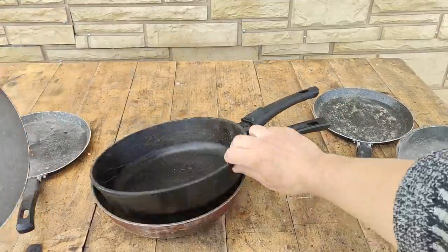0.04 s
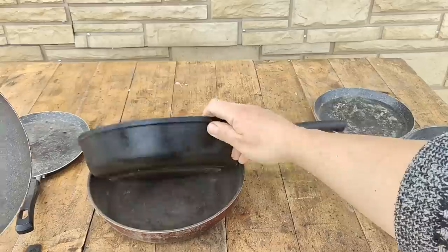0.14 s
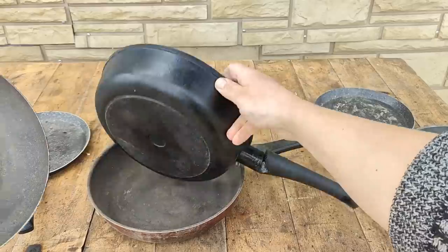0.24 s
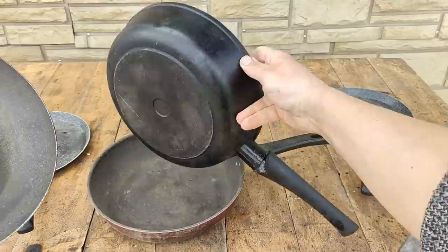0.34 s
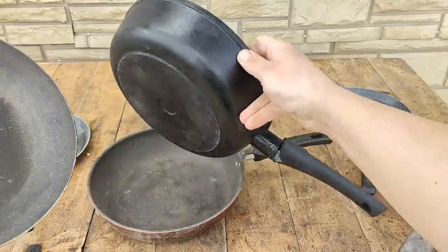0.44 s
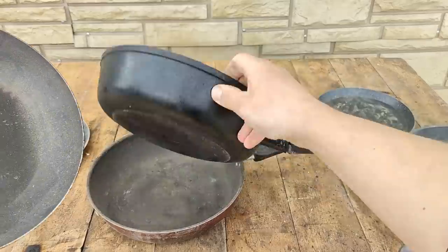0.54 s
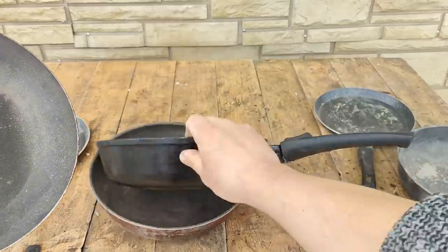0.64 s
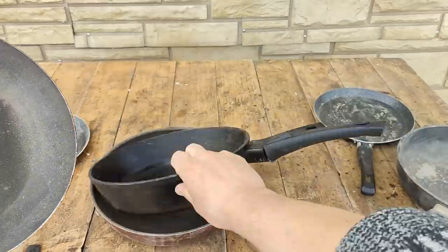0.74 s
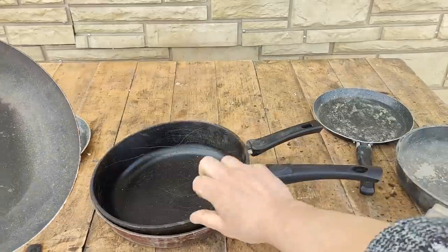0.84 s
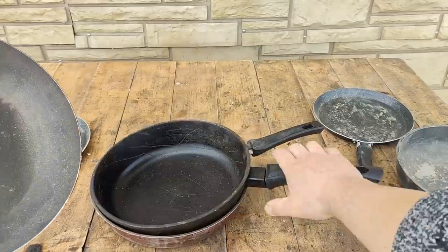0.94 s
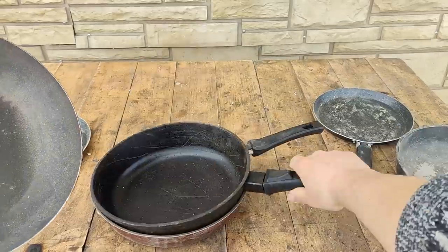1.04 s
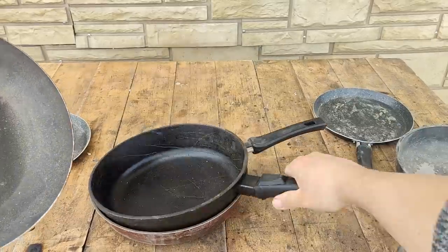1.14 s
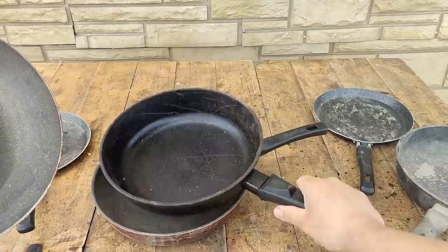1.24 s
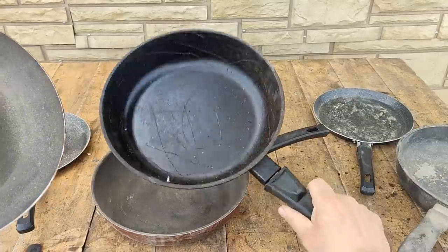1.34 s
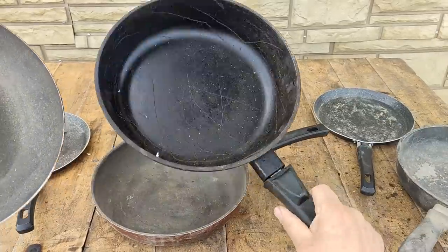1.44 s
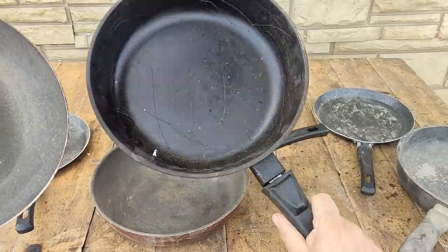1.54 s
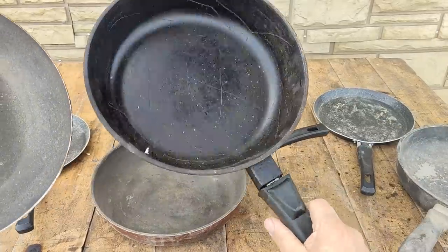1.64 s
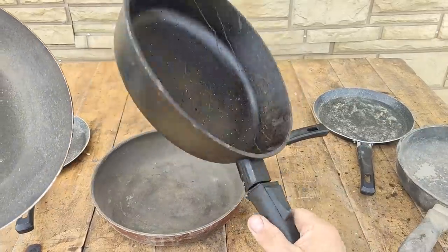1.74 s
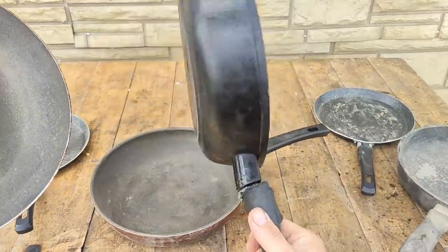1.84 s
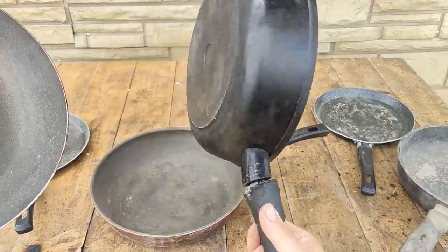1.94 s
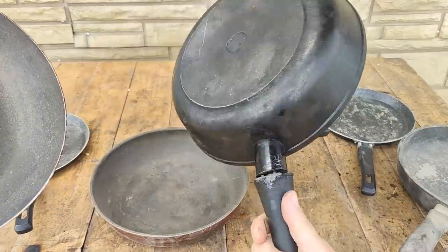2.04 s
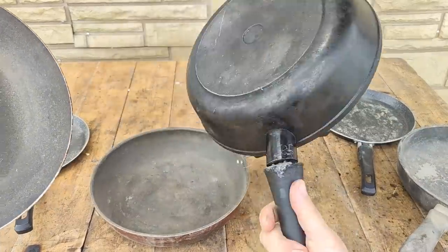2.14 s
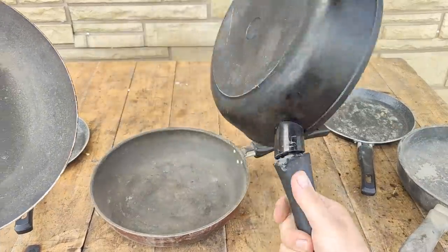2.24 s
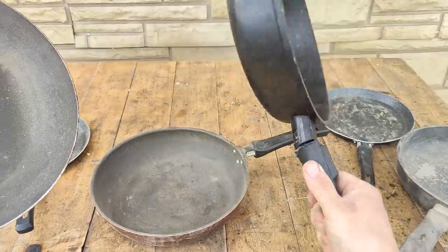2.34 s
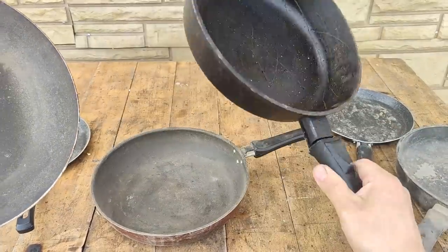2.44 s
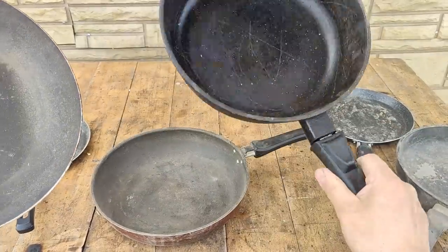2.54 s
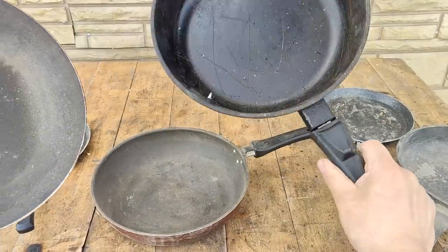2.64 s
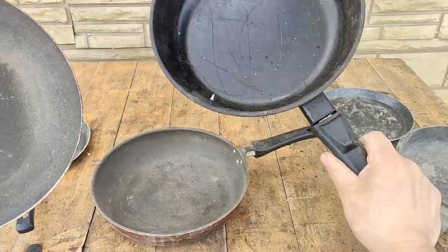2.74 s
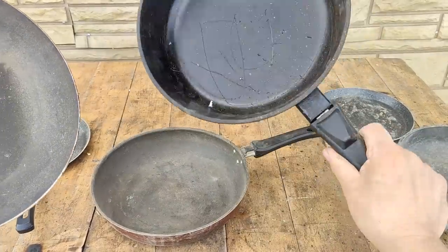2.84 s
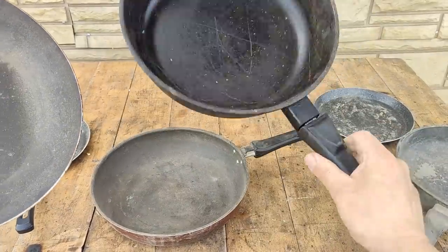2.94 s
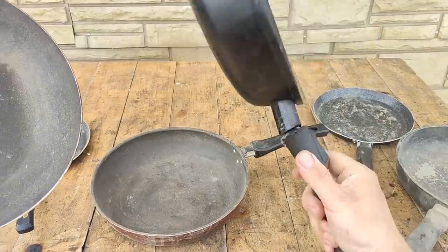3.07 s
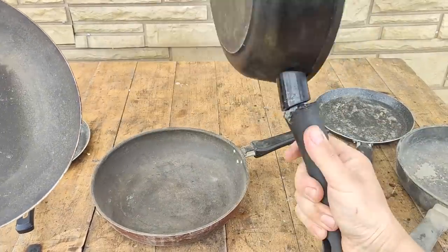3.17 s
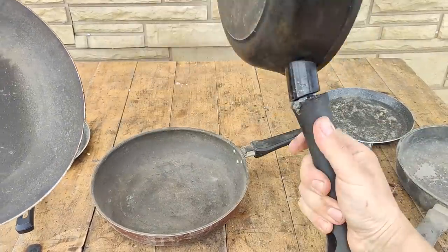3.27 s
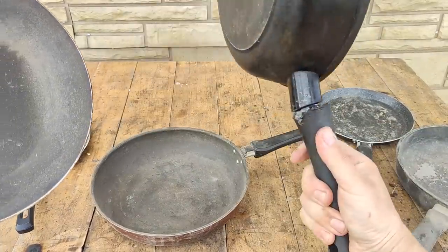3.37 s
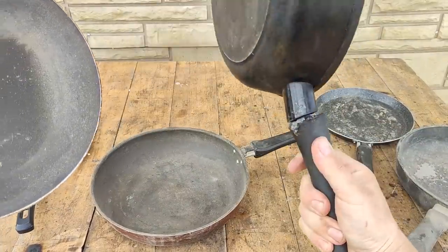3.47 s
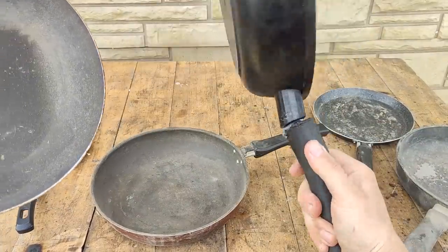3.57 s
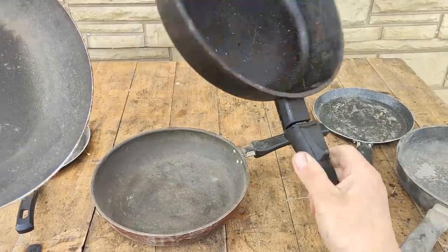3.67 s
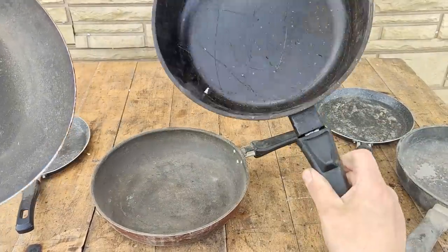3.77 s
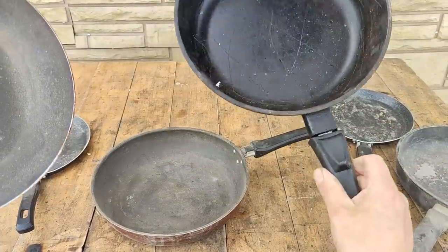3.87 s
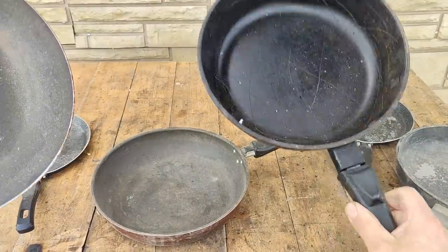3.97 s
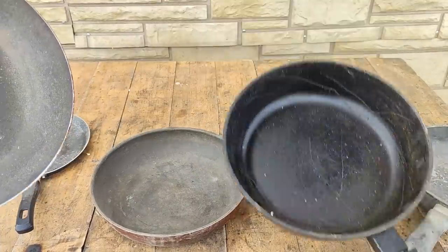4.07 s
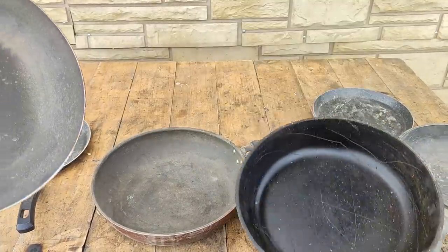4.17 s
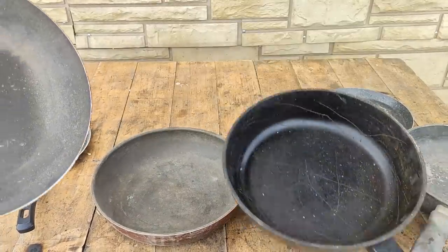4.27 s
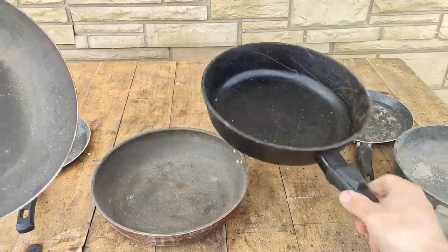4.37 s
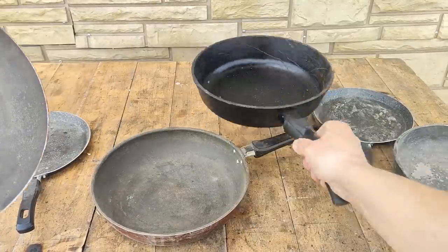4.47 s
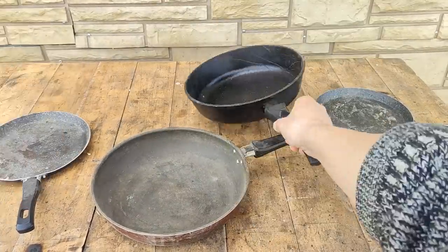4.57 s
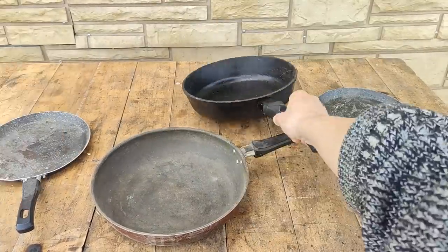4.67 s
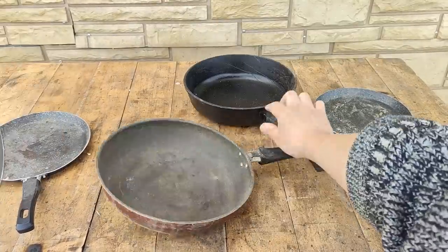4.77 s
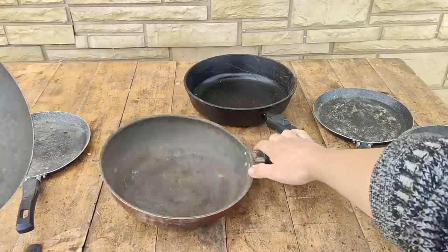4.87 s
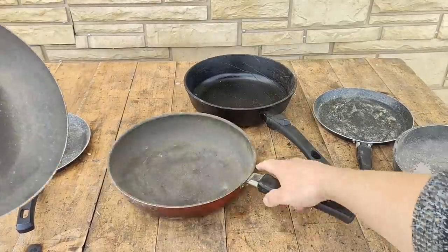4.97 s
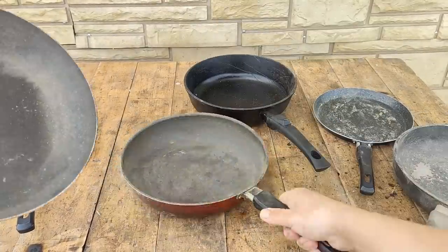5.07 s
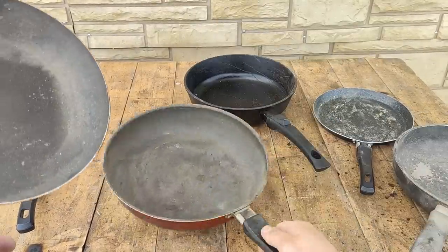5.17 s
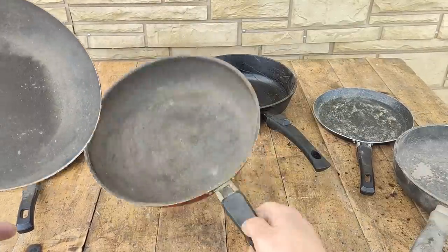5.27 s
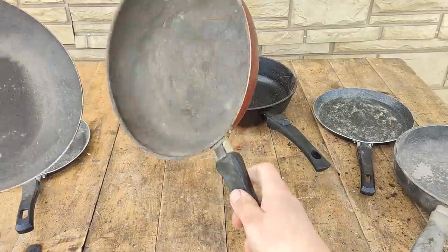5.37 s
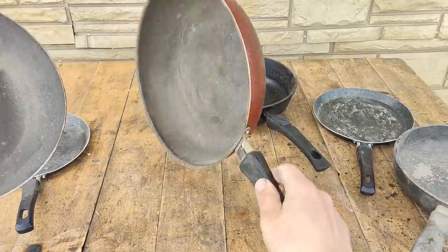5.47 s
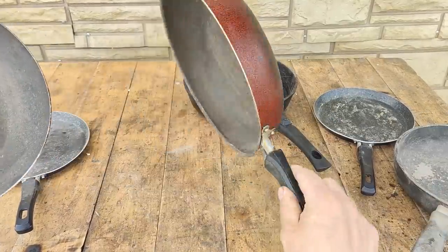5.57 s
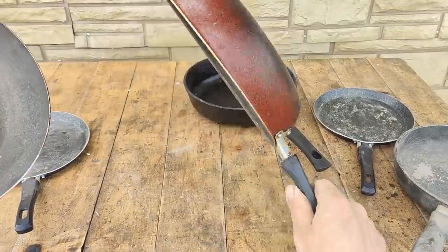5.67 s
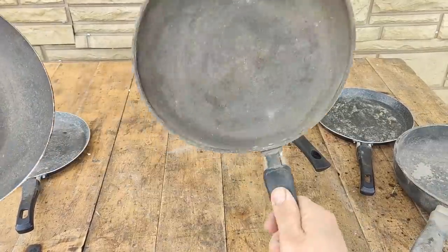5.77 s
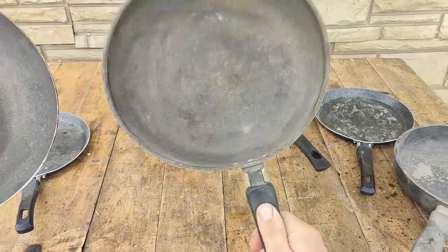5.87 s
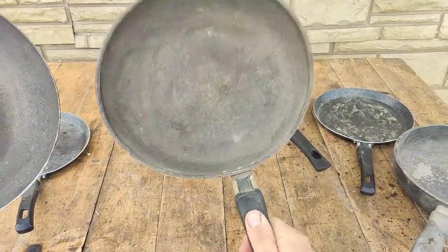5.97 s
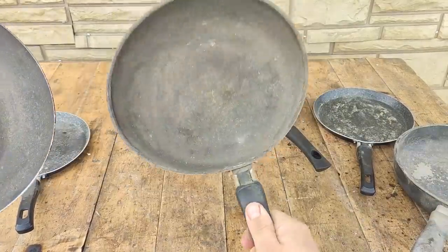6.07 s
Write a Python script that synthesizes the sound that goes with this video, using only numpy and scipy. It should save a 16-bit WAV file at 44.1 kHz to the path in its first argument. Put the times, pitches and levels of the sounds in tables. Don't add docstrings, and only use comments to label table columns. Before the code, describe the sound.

Close up on a plank table in a walled yard, a heavy pan is tipped and dropped back into another with hard, short-ringing clanks, then lifted out with lighter knocks. A few quiet seconds follow, with faint handle ticks, sleeve rustle and distant rumble. The pan clips a neighbour and thuds down; a second pan is dragged off with scraping and loose ticks.

```python
import sys
import numpy as np
from scipy import signal
from scipy.fft import rfft, irfft, next_fast_len
from scipy.io import wavfile
from scipy.ndimage import uniform_filter1d

SR = 44100
rng = np.random.default_rng(int(sys.argv[2]) if len(sys.argv) > 2 else 0)


def boost(x):
    u = np.asarray(x, float) / 20
    return 10 ** u


def materialize(psi):
    bounded = np.clip(np.atleast_2d(psi).T, -1, 1)
    quanta = np.round(bounded * 32767).astype(np.int16)
    wavfile.write(sys.argv[1], SR, quanta)


N = 269439
T = np.arange(N) / SR


def sides(db):
    return np.array([[db], [-db]])


def band(x, lo_hz, hi_hz, order=2):
    sos = signal.butter(order, [lo_hz, min(hi_hz, .45 * SR)], "band", fs=SR, output="sos")
    return signal.sosfilt(sos, x)


def unit(x):
    return x / np.sqrt(np.mean(x ** 2))


def pair(count, alike):
    mid, side = rng.standard_normal((2, count))
    alike = np.clip(alike, 0, 1)
    return np.sqrt((1 + alike) / 2) * mid + np.sqrt((1 - alike) / 2) * side * sides(1)


def coloured(x, table):
    hz, db = np.transpose(table)
    size = next_fast_len(N)
    log_hz = np.log(np.fft.rfftfreq(size, 1 / SR) + 1)
    gain = boost(np.interp(log_hz, np.log(hz), db))
    return irfft(rfft(x, size) * gain, size)[..., :N]


def walk(rate):
    hold = int(SR / rate)
    levels = np.repeat(rng.standard_normal(N // hold + 1), hold)
    return uniform_filter1d(levels, hold)[:N]


def add(out, s, sound):
    i = int(s * SR)
    n = min(sound.shape[1], N - i)
    out[:, i:i + n] += sound[:, :n]


def fade(t, t60):
    return np.exp(-np.log(1000) * t / t60)


def bump(x, centre, half):
    return np.exp(-((x - centre) / half) ** 2)


def ring(hz, db, t60, t, scatter_db, width, drift):
    hz, db, t60 = (np.reshape(v, (-1, 1)) for v in (hz, db, t60))
    size, detune, phase, skew = rng.standard_normal((4, len(hz), 1))
    skew = skew * width * np.minimum(.12 + (hz / 1400) ** 2, 1) * sides(1)[:, :, None]
    waves = np.sin(2 * np.pi * hz * (1 + drift * detune) * t + 1.436 * phase + skew)
    level = boost(db + scatter_db * size)
    return (level * fade(t, np.clip(t60, .02, 1.5)) * waves).sum(axis=1)


def through_plate(x, t60, count=70):
    t = np.arange(SR // 30) / SR
    hz = 1500 * 10 ** rng.random(count)
    plate = ring(hz, 0, t60, t, scatter_db=3.0, width=0.99, drift=0)
    plate[:, 0] = 60
    return signal.fftconvolve(x, plate, axes=1)[:, :x.shape[1]]


def rim_colour(x, width_hz, db):
    grain = sum(band(x, hz - width_hz, hz + width_hz, order=1) for hz, *_ in RIM_MODES)
    return unit(x) + boost(db) * unit(grain)


# f/Hz, density [dB per Hz]
HISS_COLOUR = [(710, -36), (1200, -4), (1340, -6.5), (1610, -13), (1750, -6.5), (2130, -11.5),
               (3790, -24.5), (5710, -37.5), (8080, -40.5), (14800, -46), (16000, -50.5)]
# t/s, level/dB
RUSTLE = [(0, 5.5), (1.5, 3), (4.1, 0.5), (5.25, 6.5), (5.55, 1.5), (6.11, 4.5)]


def self_noise():
    hiss = unit(band(coloured(pair(N, 0.15), HISS_COLOUR), 3800, 18000))
    return boost(-71.5) * hiss * boost(np.interp(T, *np.transpose(RUSTLE)))


# t/s, level/dB
YARD_LEVEL = [(0, -43), (.12, -35.5), (.39, -47), (.62, -46), (.85, -42.5), (1.3, -41), (1.9, -43),
              (2.27, -45.5), (2.62, -41.5), (3.1, -41.5), (3.4, -46.5), (3.86, -48), (4.45, -47),
              (4.72, -50), (4.98, -35), (5.28, -48), (5.7, -48), (6.05, -44.5)]
# t/s, lift/dB, half length [s]
SURGES = [(1.703, 2.5, .02), (1.8, 2.5, .02), (2.087, 7.5, .085), (2.51, 2.5, .03), (2.946, 2, .03),
          (3.242, 2.5, .03), (3.498, 4.5, .03), (3.59, 5.5, .055), (4.048, 2, .04)]


def rumble_level():
    surges_db = sum(db * bump(T, s, half) for s, db, half in SURGES)
    return np.interp(T, *np.transpose(YARD_LEVEL)) + surges_db


# f/Hz, density [dB per Hz]
YARD_COLOUR = [(15, -68.5), (25, -39), (82, -18), (149, -23.5), (225, -17.5), (285, -9.5), (384, -6.5),
               (560, -7), (641, -10.5), (863, -10), (988, -20), (1610, -25.5), (2760, -23), (4250, -45.5),
               (13600, -56.5), (16000, -61.5)]


def wind():
    air = unit(band(coloured(pair(N, 0.89), YARD_COLOUR), 14, 135, order=1))
    return boost(-56) * air * boost(sides(1.5)) * boost(2 * walk(6))


def far_hiss(rumble_db):
    follows, sag_db_per_s = .45, 1
    level_db = -58 + follows * (rumble_db - np.mean(rumble_db)) - sag_db_per_s * T
    hiss = unit(band(coloured(pair(N, 0.2), HISS_COLOUR), 1400, 4200))
    return hiss * boost(level_db + 1.5 * walk(25))


# f/Hz, width [Hz], level/dB
HOLLOWS = [(300, 240, -4.5), (380, 160, -2), (558, 140, 2), (590, 140, -11), (720, 50, -3), (866, 36, -2.5),
           (967, 35, -4.5), (1076, 76, -5), (1336, 34, -13)]


def rumble(rumble_db):
    air = coloured(pair(N, 0.94), YARD_COLOUR)
    air[0] = np.roll(air[0], 7)
    hollow = 0
    for hz, w, db in HOLLOWS:
        resonance = unit(band(air, hz - w / 2, hz + w / 2, order=1))
        hollow = hollow + boost(db) * resonance * boost(2.5 * walk(6))
    open_air = 0
    for hz in 200 * 2 ** np.arange(0, 3, 1 / 3):
        open_air = open_air + band(air, hz * .89, hz * 1.12, order=1) * boost(2.0 * walk(17))
    mixed = unit(unit(open_air) + boost(-1.0) * unit(hollow))
    return mixed * boost(rumble_db + sides(.4))


def yard():
    rumble_db = rumble_level()
    return rumble(rumble_db) + far_hiss(rumble_db) + wind() + self_noise()


# t/s, f/Hz, level/dB, half length [s]
FLARES = [(0.6, 1010, -49, 0.041), (6.0, 830, -50, 0.09), (1.518, 930, -52, 0.054),
          (1.529, 753, -49.5, .04), (1.602, 399, -46, .1), (1.708, 1076, -54, 0.032),
          (1.813, 700, -40.5, 0.038), (2.04, 1415, -56, .04), (2.059, 297, -41.5, 0.098),
          (2.072, 1055, -47, 0.061), (2.093, 635, -38.5, 0.05), (2.196, 900, -51.5, 0.029),
          (2.371, 925, -49, .03), (2.392, 406, -45.5, 0.032), (5.77, 530, -49, .08), (2.598, 323, -43, .12),
          (2.621, 840, -49.5, 0.049), (2.661, 704, -47.5, 0.042), (2.821, 540, -42.5, 0.027),
          (2.948, 363, -40.5, 0.053), (3.017, 1055, -50, .04), (3.05, 522, -44, 0.08),
          (3.081, 930, -45, 0.057), (3.141, 350, -44.5, 0.097), (3.219, 875, -50.5, 0.036),
          (3.511, 259, -47, 0.042), (3.51, 495, -43.5, 0.045), (3.569, 830, -42, 0.058),
          (3.6, 590, -44.5, 0.076), (4.051, 865, -51.5, 0.051), (5.95, 252.7, -51.5, 0.14)]


def flares(spread):
    out = np.zeros((2, N))
    for s, hz, db, half in FLARES:
        t = np.arange(-3 * half, 3 * half, 1 / SR)
        swell = unit(band(pair(len(t), 1.0), hz * (1 - spread), hz * (1 + spread)))
        swell[0] = np.roll(swell[0], 7)
        add(out, s + t[0], boost(db) * swell * bump(t, 0, half))
    return out


# t/s, half length [s], level/dB
SLEEVE = [
    (1.758, 0.1, -71),
    (1.95, 0.12, -74),
    (2.761, .12, -71.5),
    (3.45, .1, -75.5),
    (4.49, 0.097, -69),
]


def sleeve():
    peak = band(pair(N, 0.34), 6600, 7640)
    wool = unit(peak + boost(-10.0) * band(pair(N, 0.32), 4400, 12000))
    return wool * sum(boost(db) * bump(T, s, half) for s, half, db in SLEEVE)


# t/s, peak level/dB, length [s], click level/dB
TICKS = [(0.553, -66.5, 0.014, -4), (2.4, -63.5, .012, 2.5), (2.840, -75, 0.0063, 23),
         (3.054, -75.5, 0.0087, 23), (3.156, -68.5, 0.0087, 8), (3.715, -66.5, 0.011, -0.5),
         (3.842, -72.5, .007, 6), (5.415, -66.5, 0.025, -12), (5.5548, -64, 0.012, 6.5),
         (5.7104, -60, 0.018, 3), (5.79, -63, 0.024, -12), (5.9404, -66, 0.012, 8), (6.034, -72, .012, 4),
         (6.087, -66, 0.007, 8)]


def handle():
    out, t = np.zeros((2, N)), np.arange(SR // 8) / SR
    for s, db, length, click_db in TICKS:
        crackle = pair(len(t), 0.18) * boost(1.5 * rng.exponential(size=len(t)))
        metal = unit(rim_colour(band(crackle, 3600, 17500), width_hz=60, db=-9))
        shape = t / length * np.exp(1 - t / length) + boost(click_db) * fade(t, 0.011)
        add(out, s, boost(db - 1) * metal * shape)
    return out


# t/s of most pressure, build-up [s], let-go [s], body level/dB, hiss level/dB
SCRAPES = [(.07, 0.03, .12, -44, -53), (.158, 0.13, 0.082, -48, -46.5), (.225, 0.1, 0.12, -45, -51),
           (.816, .06, .06, -56, -46.5), (.945, 0.075, 0.125, -36, -42), (1.165, 0.075, 0.09, -46, -47.5),
           (1.36, .2, 0.075, -64, -60), (4.33, .15, 0.089, -51, -62), (4.87, 0.05, 0.1, -48, -39.5),
           (4.914, 0.075, 0.12, -30, -44), (5.0, 0.11, 0.1, -46.5, -35.5), (5.13, 0.06, 0.11, -42, -44)]
# f/Hz, density [dB per Hz]
GRIT = [(700, -30), (1100, -6.5), (2000, -8), (4000, -8.5), (7000, -11), (11000, -20), (14000, -19),
        (16000, -29.5)]


def scrape():
    clicks = pair(N, 0.3) * boost(2.0 * rng.exponential(size=N) + 3 * walk(110))
    grit = coloured(clicks, GRIT)
    body = unit(band(grit, 980, 5200))
    hiss = unit(rim_colour(band(grit, 3500, 16000), width_hz=45, db=-9))
    range_db = 20.5
    out = 0
    for s, build, let_go, body_db, hiss_db in SCRAPES:
        away = np.where(T < s, (s - T) / build, (T - s) / let_go)
        pressure = boost(-range_db * away ** 1.15)
        out = out + pressure * (boost(body_db) * body + boost(hiss_db) * hiss)
    return out


# t/s, level/dB, t60 [s]
BOUNCES = [
    (0.151, -50, 0.22),
    (.77, -51, 0.18),
    (.882, -38, 0.29),
    (4.208, -39, 0.17),
    (4.271, -37, .3),
    (5.03, -37.5, 0.36),
    (5.065, -32, 0.15),
]


def table_top():
    out, t = np.zeros((2, N)), np.arange(SR // 3) / SR
    for s, db, t60 in BOUNCES:
        shudder = unit(band(pair(len(t), 0.5), 135, 240, order=3)) * boost(sides(1.5))
        add(out, s, boost(db) * shudder * fade(t, t60) * np.minimum(t / 0.01, 1))
    return out


# t/s, f/Hz, level/dB, rise [s], t60 [s]
FREE_RINGS = [(1.135, 6600, -52, .032, .39), (4.73, 6599, -50, .04, .33), (5.16, 838, -43, .03, .4),
              (5.36, 832, -50, .06, 1.4), (5.12, 1850, -59, .036, .6), (5.19, 2840, -56, .04, .9),
              (4.87, 3905, -49, .045, .5), (5.1, 3950, -52, .035, .6), (5.94, 4520, -62, .004, .22)]


def free_rings():
    out, t = np.zeros((2, N)), np.arange(SR // 2) / SR
    for s, hz, db, rise, t60 in FREE_RINGS:
        line = ring(hz, db, t60, t, scatter_db=2.0, width=0.52, drift=0)
        add(out, s, line * np.minimum(t / rise, 1) * boost(2.5 * walk(40)[:len(t)]))
    return out


# t/s, f/Hz, level/dB, t60 [s]
EARLY_PINGS = [(0.1465, 837, -12, 0.063), (0.1465, 2130.0, -14.5, 0.05), (0.1465, 1040, -17.0, 0.1),
               (0.1465, 4810, -30.5, 0.116), (0.161, 504.5, -14.5, 0.076), (0.161, 1021, -14.0, 0.077),
               (0.161, 2260, -29.0, 0.108), (0.161, 790, -15.0, 0.09), (0.691, 760.0, -21.0, 0.044),
               (0.691, 3230, -32.0, 0.072), (0.691, 5640.0, -29.0, 0.067), (0.691, 7000.0, -32.0, 0.05),
               (0.7235, 2038, -18.0, 0.12), (0.7235, 2790.0, -22.0, 0.149), (0.7235, 3930, -20.0, 0.088),
               (0.7235, 5830.0, -24.0, 0.07), (0.7235, 2320, -21.0, 0.15), (0.739, 2770, -27.0, 0.124),
               (0.739, 5090.0, -34.0, 0.186), (0.739, 5520.0, -33.0, 0.106), (0.7665, 798, -14.5, 0.1),
               (0.7755, 2150.0, -21.0, 0.073), (0.7745, 2720.0, -25.0, 0.052), (0.776, 3100, -22.0, 0.06),
               (0.776, 420.0, -19.5, 0.1), (0.776, 610.0, -15.0, 0.091), (0.7665, 511, -20.0, 0.13),
               (0.7235, 5510, -28.0, 0.15), (0.8805, 1800.0, -17.5, 0.079), (0.8805, 2607, -23.0, 0.25),
               (0.892, 4450, -29.0, 0.15), (0.8805, 3430.0, -23.5, 0.118), (0.892, 1135, -19, 0.089),
               (0.892, 2200, -20.0, 0.046), (0.892, 2590, -23.0, 0.122), (0.892, 8550.0, -28.0, 0.046),
               (0.915, 522, -21.0, 0.069), (0.8805, 1120, -17.5, 0.1), (0.8805, 1985, -19.5, 0.1),
               (0.8805, 490, -16.0, 0.11), (1.224, 804, -31.5, 0.25), (1.224, 1100.0, -27.0, 0.1),
               (1.224, 6590.0, -45.0, 0.217), (1.255, 639, -21.0, 0.148), (1.255, 848, -24, 0.091),
               (1.255, 1854, -21, 0.061), (1.255, 6880, -33, 0.088), (1.266, 607, -17, 0.056),
               (1.258, 1050, -19.0, 0.09), (1.266, 2070, -32.0, 0.25)]
# t/s, f/Hz, level/dB, t60 [s]
LATE_PINGS = [(4.2055, 2084, -31.5, 0.098), (4.2055, 3680.0, -28, 0.069), (4.206, 4450, -24, 0.055),
              (4.212, 512, -25.5, 0.073), (4.235, 2490.0, -37.0, 0.28), (4.235, 1120, -32, 0.05),
              (4.235, 4330.0, -30.0, 0.15), (4.235, 4500, -36, 0.157), (4.265, 541, -23.0, 0.21),
              (4.268, 700.0, -27.0, 0.1), (4.264, 2500.0, -27.0, 0.054), (4.275, 290.0, -27.5, 0.13),
              (4.695, 772, -11.0, 0.082), (4.694, 1054, -12, 0.085), (4.694, 1880, -23, 0.14),
              (4.694, 2210, -17.5, 0.078), (4.7, 390.0, -16.0, 0.15), (4.73, 574, -22.5, 0.12),
              (4.729, 1095, -21.0, 0.067), (4.73, 2180.0, -26, 0.06), (4.825, 1250.0, -19.5, 0.07),
              (4.824, 2160.0, -22, 0.18), (4.824, 2550.0, -31, 0.25), (4.824, 3570, -30.0, 0.14),
              (4.8417, 380.0, -17.5, 0.15), (4.8415, 645, -11.0, 0.053), (4.8415, 2120, -27, 0.13),
              (4.8415, 2580.0, -26.0, 0.23), (4.868, 602, -23.5, 0.168), (4.868, 2130, -29, 0.051),
              (4.868, 2850.0, -29.0, 0.078), (4.8415, 1110, -18, 0.098), (4.902, 760.0, -17.5, 0.11),
              (4.903, 1154, -17, 0.051), (4.902, 1490, -20.5, 0.065), (4.925, 880, -25, 0.15),
              (4.94, 4000.0, -34.0, 0.12), (4.972, 770, -28.0, 0.097), (4.868, 420, -19.0, 0.097),
              (4.696, 1780, -21.5, 0.13), (5.005, 270, -26, 0.11), (5.007, 470.0, -29.0, 0.28),
              (5.023, 471, -19.5, 0.097), (5.023, 637, -18.5, 0.056), (5.023, 1114, -12.5, 0.041),
              (5.0255, 2186, -19.0, 0.052), (5.041, 391, -29.0, 0.15), (5.04, 790.0, -23.0, 0.063),
              (5.075, 336, -26.5, 0.074), (4.695, 1170, -16.5, 0.093)]
# t/s, f/Hz, level/dB, t60 [s]
SLAPS = [(.691, 2650, -24, 0.041), (0.691, 4504, -24.5, 0.025), (.7235, 2270, -11, .05),
         (0.7238, 3050, -12, .05), (0.8807, 886, -10, .04), (4.206, 5150, -23, 0.041),
         (5.0255, 3494, -29.5, 0.037)]


def pings(rise_cycles, width):
    out, t = np.zeros((2, N)), np.arange(SR // 5) / SR
    starts = [touch[0][0][0] for touch in TOUCHES]
    pans_db = [touch[3] for touch in TOUCHES]
    for s, hz, db, t60 in EARLY_PINGS + LATE_PINGS + SLAPS:
        pan_db = pans_db[np.searchsorted(starts, s + .004) - 1]
        line = ring(hz, db, min(t60, .15), t, scatter_db=0, width=width, drift=0)
        line = line * np.minimum(t * hz / rise_cycles, 1)
        add(out, s, boost(sides(pan_db / 2)) * line * boost(2.0 * walk(150)[:len(t)]))
    return out


# low f/Hz, high f/Hz, share level/dB, t60 [s], left-right likeness [0-1], build-up [s]
BANDS = [
    (229, 1240, -11, 0.13, 0.9, 0.0011),
    (1240, 4230, -8.5, 0.23, 0.2, 0.00047),
    (4070, 15000, -3.5, 0.13, 0, 0.00037),
]
# f/Hz, t60 [s], level/dB when the base, the rim or the planks take the blow
PLATE_MODES = [(256, 0.089, -29, -14.5, -5), (399, 0.11, -10, -5.5, 0), (508, 0.1, -3.5, -4.5, 0),
               (592, .15, -7, -8, -3.5), (642, 0.1, -4, -6, -7.5), (765, .11, -3, -5, -3),
               (822, .086, -2.5, -4.5, -14), (857, 0.057, -6, -12, -16.5), (1060, 0.1, -2, -6, -3.5),
               (1178.5, 0.099, -12, -13, -22)]
# f/Hz, t60 [s], level/dB for base, rim, planks
WALL_MODES = [(1370, 0.062, -19.5, -14, -10), (1510, .03, -19, -12, -24), (1705, .03, -19, -13, -26),
              (1818, .1, -14, -14, -17), (2040, 0.14, -10.5, -11, -17), (2159, 0.064, -9, 0, -14),
              (2354, .18, -19, -9, -10.5), (2546, 0.19, -18, -11, -13), (2720, .09, -16, -8.5, -31),
              (3050, .066, -24.5, -8.5, -39), (3150, .041, -19, -8.5, -35), (3230, 0.091, -19, -8, -35),
              (3456, 0.16, -16, -11.5, -22.5), (3690, .13, -16.5, -7.5, -24)]
# f/Hz, t60 [s], level/dB for base, rim, planks
RIM_MODES = [(3970, .051, -29, -14, -40), (4448, 0.055, -22.5, -8.5, -29), (4587, .069, -24, -11, -19),
             (4800, 0.048, -26, -19, -38), (5150, .1, -22.5, -11, -35), (5510, .12, -26, -13, -40),
             (5830, 0.053, -26, -11, -30), (6590, 0.15, -20, -16, -19), (7190, .1, -22, -15, -29),
             (8800, .07, -25, -19, -40), (9180, 0.068, -26.5, -19, -40), (10600, .06, -26, -19, -40),
             (11460, .06, -25.5, -20, -40)]
STRUCK = ["base", "rim", "planks"]


def strike(t, band_db, struck, stretch):
    chatter = boost(-30.5) * pair(len(t), 0.99) * fade(t, 0.18 * stretch)
    chatter[:, 0] = 1
    sound = 0
    for db, modes, dense_band in zip(band_db, (PLATE_MODES, WALL_MODES, RIM_MODES), BANDS):
        lo_hz, hi_hz, share_db, t60, alike, rise = dense_band
        hz, mode_t60, *struck_db = np.transpose(modes)
        mode_db = struck_db[STRUCK.index(struck)]
        clear = ring(hz, mode_db, mode_t60 * stretch, t, scatter_db=2.0, width=0.64, drift=0.0087)
        clear = signal.fftconvolve(clear, chatter, axes=1)[:, :len(t)]
        clear = clear / np.sqrt(np.sum(boost(mode_db) ** 2))
        shape = fade(t, .6 * t60 * stretch) + boost(-9.5) * fade(t, 1.8 * t60)
        dense = unit(band(through_plate(pair(len(t), alike), t60=0.026), lo_hz, hi_hz)) * shape
        slap = 1 + 0.5 * fade(t, 0.028) + lo_hz / 3800 * fade(t, 0.012)
        push = np.minimum(t / rise, 1) * slap
        sound = sound + boost(db) * push * (boost(-3.5) * clear + boost(share_db) * dense)
    return sound


# t/s, thud level/dB, clank level/dB, crack level/dB
TIPPED_UP = [(.078, -28.5, -39, -55), (.099, -21, -44, -52), (.133, -23, -34, -41),
             (.138, -24.5, -20.5, -30.5), (.1465, -9, -10, -18), (.161, -6.5, -20.5, -28),
             (.168, -16, -21.5, -30.5), (.200, -22, -25, -43)]
# t/s, thud level/dB, clank level/dB, crack level/dB
RIM_ON_RIM = [(.691, -24, -19.5, -21), (.699, -18.5, -26, -31), (.7235, -14, -7, -13),
              (.739, -18, -15, -24)]
# t/s, thud level/dB, clank level/dB, crack level/dB
BASE_LANDS = [(.7665, -8.5, -22, -30), (.775, -7, -13, -22), (.812, -25.5, -34, -40.5)]
# t/s, thud level/dB, clank level/dB, crack level/dB
DROPS_HOME = [(.869, -22.5, -24, -28.5), (.8805, -4, -8, -20.5), (.892, -10, -15.5, -15),
              (.915, -13, -20, -33)]
# t/s, thud level/dB, clank level/dB, crack level/dB
LIFTED_OUT = [(1.091, -34, -40, -65.5), (1.224, -23, -29.5, -29.5), (1.240, -21.5, -47.5, -37.5),
              (1.255, -14, -20, -27), (1.2606, -30, -23, -19), (1.266, -15, -21, -29),
              (1.309, -25, -33, -39), (1.334, -25, -45, -50)]
# t/s, thud level/dB, clank level/dB, crack level/dB
CLIPS_NEIGHBOUR = [(4.2055, -21, -20, -22), (4.214, -19.5, -23.5, -29), (4.235, -28, -22.5, -33),
                   (4.265, -16.5, -25, -44), (4.277, -19, -27, -53), (4.298, -19, -42, -53),
                   (4.318, -19.5, -43, -62), (4.345, -23, -48, -68)]
# t/s, thud level/dB, clank level/dB, crack level/dB
SET_DOWN = [(4.694, -4.5, -11, -32.5), (4.703, -9, -19, -34), (4.727, -10, -22, -46)]
# t/s, thud level/dB, clank level/dB, crack level/dB
DRAGGED = [(4.824, -15, -11, -18.5), (4.8415, -4, -11, -35), (4.867, -11, -10.5, -27),
           (4.9012, -11, -19, -25), (4.925, -20.5, -30, -49), (4.940, -26, -23, -39),
           (4.972, -25, -22, -31)]
# t/s, thud level/dB, clank level/dB, crack level/dB
LEAVES_TABLE = [(5.007, -18, -49, -50), (5.023, -9.5, -27, -28.5), (5.0265, -16, -19, -33),
                (5.040, -18.5, -36, -53), (5.055, -20, -40, -50), (5.075, -24.5, -42, -52),
                (5.109, -30, -44, -43)]
# blows, what is struck, ring length factor [1], left minus right level/dB
TOUCHES = [
    (TIPPED_UP, "base", 0.77, -.6),
    (RIM_ON_RIM, "rim", .65, -.3),
    (BASE_LANDS, "base", .75, -.3),
    (DROPS_HOME, "base", .8, -.5),
    (LIFTED_OUT, "base", 0.83, .4),
    (CLIPS_NEIGHBOUR, "rim", 0.9, 0.68),
    (SET_DOWN, "planks", 0.73, .2),
    (DRAGGED, "rim", 0.85, .2),
    (LEAVES_TABLE, "planks", 0.61, 6.4),
]


def blows(gain_db):
    out, t = np.zeros((2, N)), np.arange(SR // 4) / SR
    hard_damp_per_db = 0.01
    for events, struck, ring_factor, pan_db in TOUCHES:
        for s, *band_db in events:
            stretch = np.clip(ring_factor - hard_damp_per_db * (max(band_db) + 16.5), .2, 1.2)
            sound = strike(t, band_db, struck, stretch)
            add(out, s, boost(gain_db + sides(pan_db / 2)) * sound * np.minimum((t[-1] - t) / .05, 1))
    return band(out, 190, 18000, order=3)


def scene():
    background = yard() + flares(spread=.09)
    small_sounds = sleeve() + handle() + scrape()
    pans = table_top() + free_rings() + pings(rise_cycles=0.97, width=0.48) + blows(gain_db=-6.0)
    return background + small_sounds + pans


def top_cut(x):
    return signal.sosfilt(signal.butter(12, 16810, fs=SR, output="sos"), x)


def record(dry):
    soft = np.tanh(1.45 * dry) / 1.25
    top_hz, ripple_db = 14200, .5
    mix = signal.sosfilt(signal.cheby1(6, ripple_db, top_hz, fs=SR, output="sos"), soft)
    return top_cut(mix)


dry = scene()
out = record(dry)
materialize(out)
```